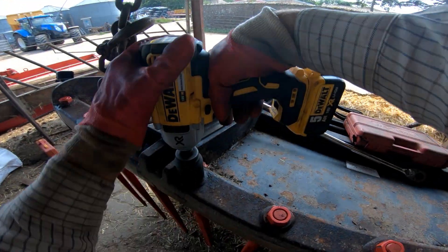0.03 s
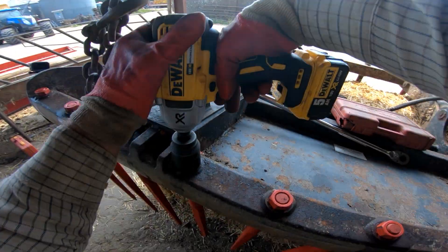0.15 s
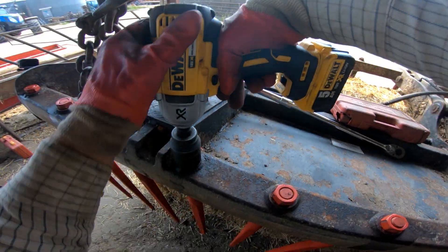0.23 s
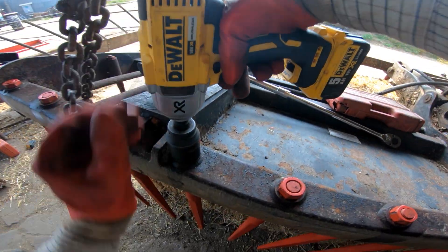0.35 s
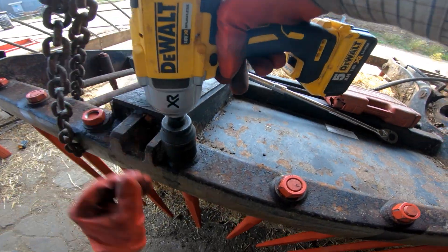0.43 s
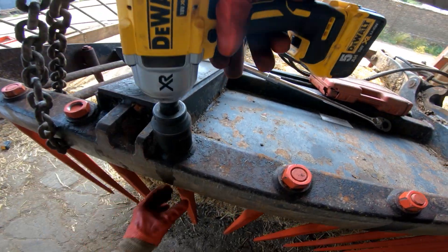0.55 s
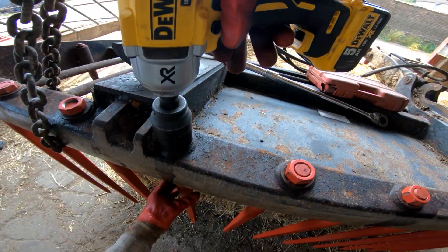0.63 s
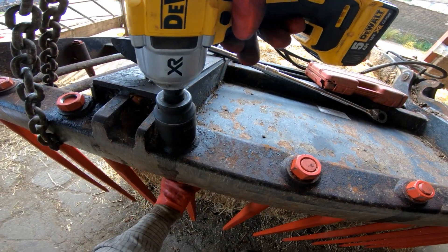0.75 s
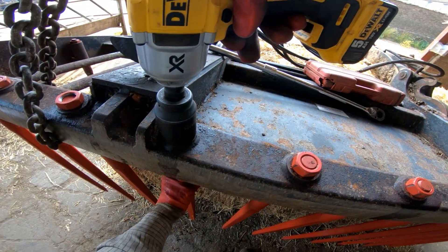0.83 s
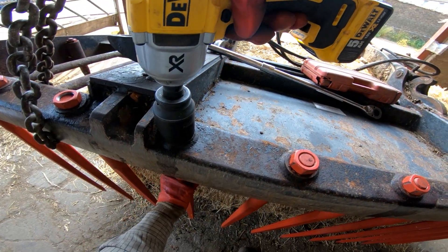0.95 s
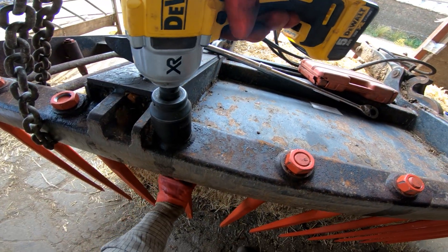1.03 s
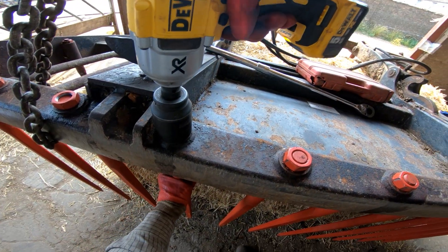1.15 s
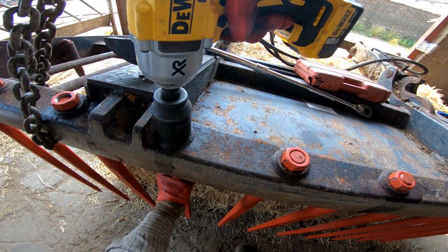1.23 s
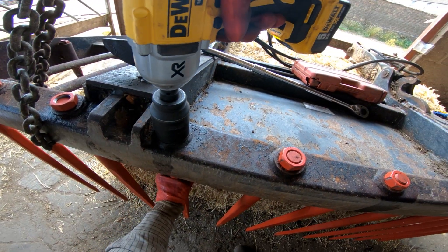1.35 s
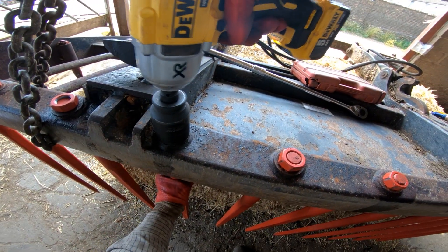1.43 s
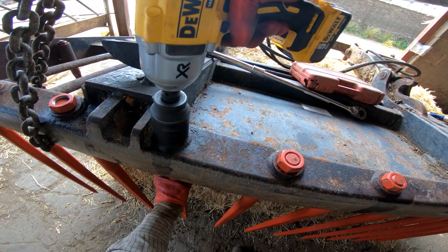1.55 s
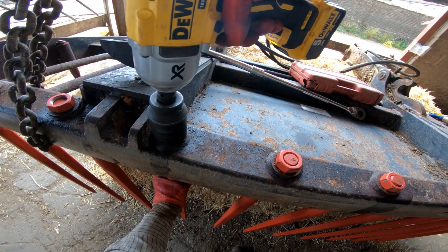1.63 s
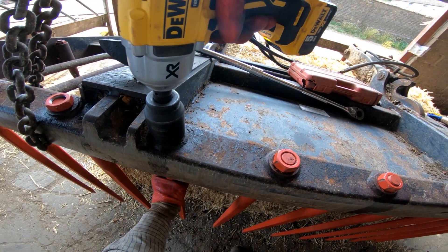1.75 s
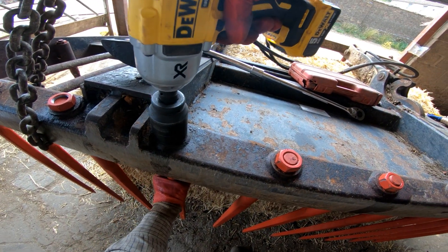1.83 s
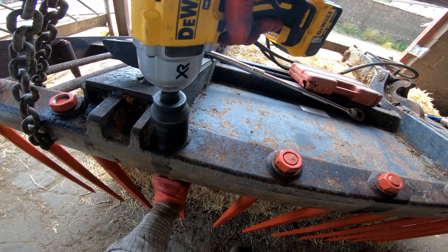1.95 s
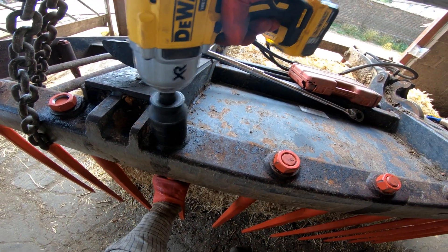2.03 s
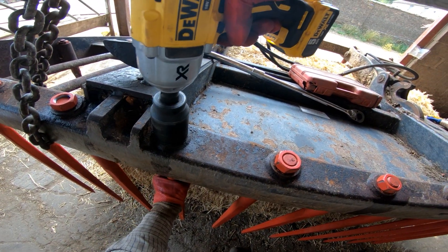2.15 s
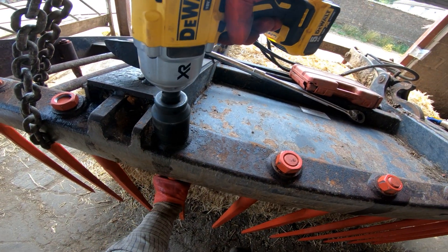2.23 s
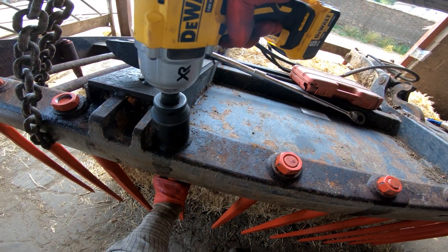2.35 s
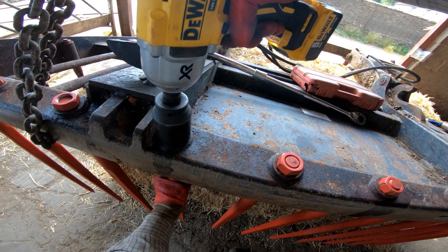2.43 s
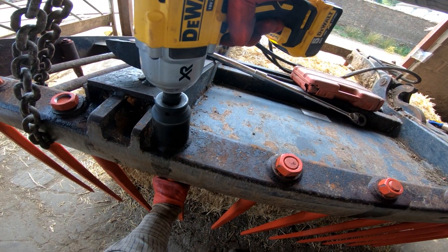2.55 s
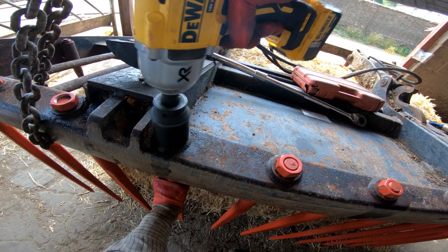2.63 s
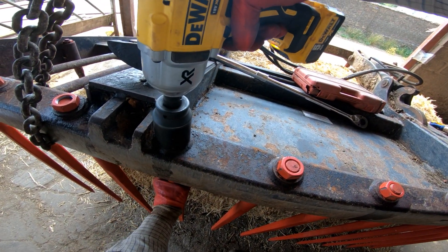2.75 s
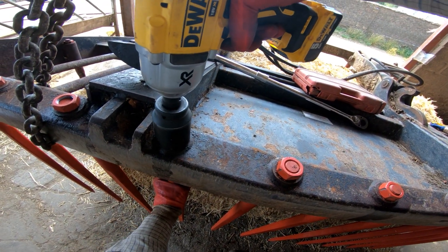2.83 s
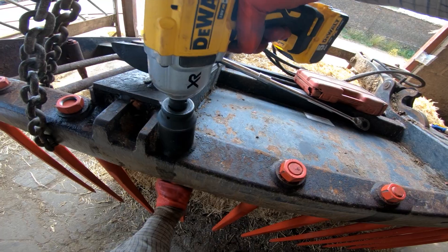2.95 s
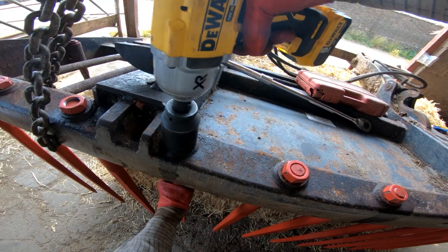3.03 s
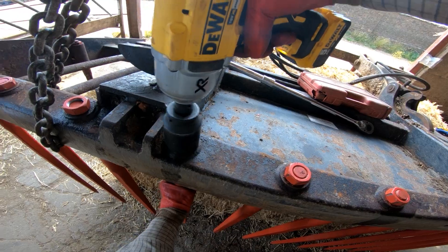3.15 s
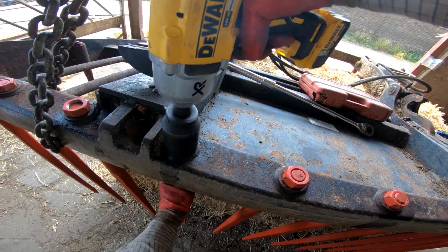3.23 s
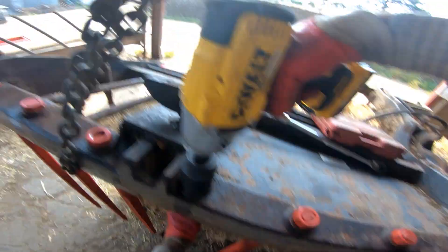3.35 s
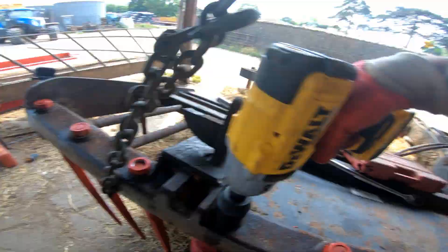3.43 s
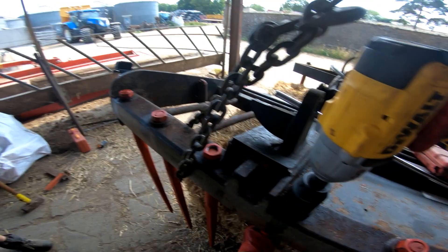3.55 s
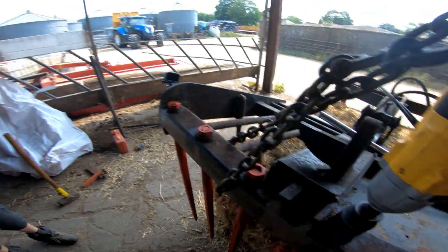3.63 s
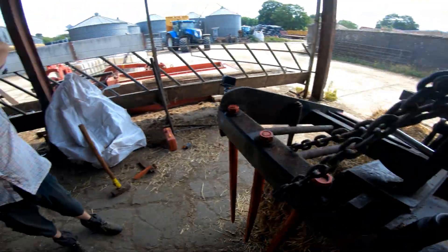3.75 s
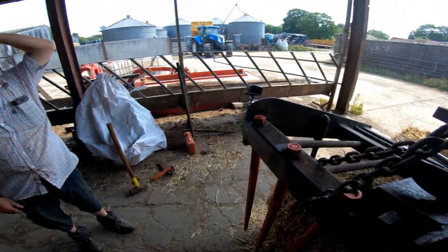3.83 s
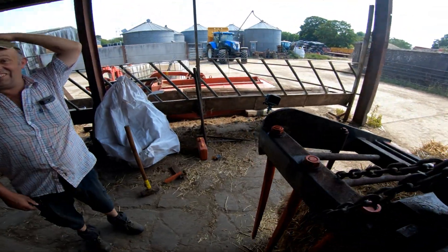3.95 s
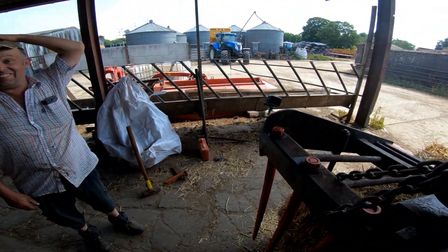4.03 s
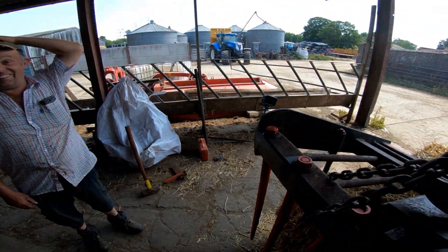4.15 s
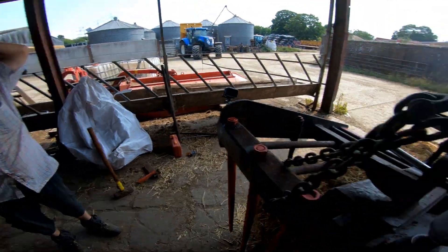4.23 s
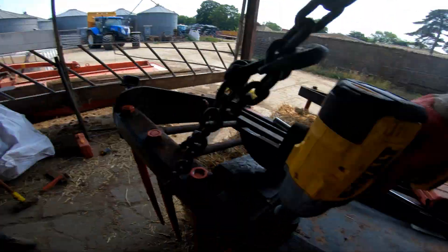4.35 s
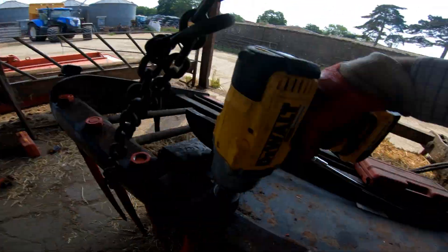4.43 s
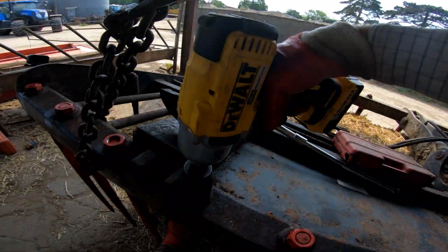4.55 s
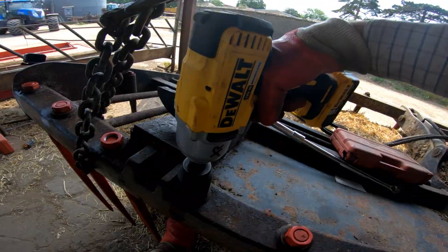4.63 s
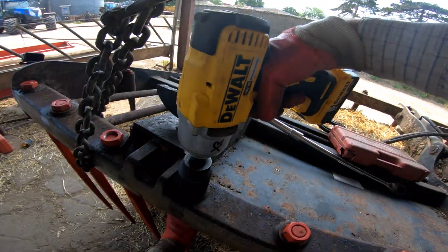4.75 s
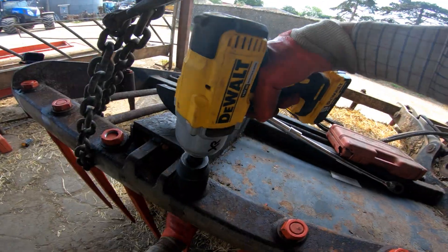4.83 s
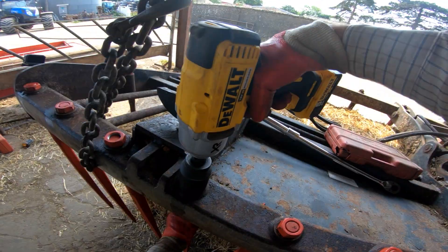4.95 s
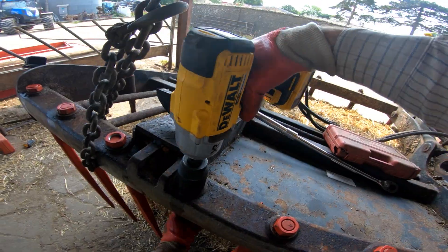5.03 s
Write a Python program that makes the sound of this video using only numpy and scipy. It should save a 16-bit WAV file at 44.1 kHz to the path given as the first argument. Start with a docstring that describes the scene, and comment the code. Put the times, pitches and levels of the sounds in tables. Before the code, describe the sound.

Diesel idle and hiss come first, with a soft low bump. Then a brief electric whirr and socket rattle lead into uneven first cracks and a loud, steady metallic hammering that buries the sinking engine. Gear whine and rattle sit beneath the blows. Past three seconds the colour shifts as the head turns, and the hammering runs on to the cut. Open shed, close action-camera microphone, almost mono with little echo.

```python
"""A cordless impact wrench tightens a nut on a heavy steel farm implement in an open shed.
First a diesel idles: firing pulses ring exhaust modes under shaped hiss, with wind rumble and low bumps.
At 1.2 s the wrench runs up: gear ticks, rotor hum, faster socket ticks. Uneven blows catch at 1.28 s, then
about 43 a second ring socket (noise bands) and frame (sine modes) while the engine sinks. From 3.4 s the
listener's head turns away, later partly back; two low tones slide down after 4.3 s. Almost mono."""
import sys
import numpy as np
from scipy import signal
from scipy.fft import rfft, irfft
from scipy.io import wavfile

SR = 44100
rng = np.random.default_rng(int(sys.argv[2]) if len(sys.argv) > 2 else 0)


def int16_out(signal):
    """Quantize to a 16-bit WAV file."""
    q = np.round(np.clip(np.atleast_2d(signal).T, -1, 1) * 32767)
    wavfile.write(sys.argv[1], SR, q.astype(np.int16))


N = 224380


def from_db(db):
    """Amplitude ratio of a level in dB."""
    return 10 ** (np.asarray(db) / 20)


def rms_one(x):
    """Scales a signal to rms 1."""
    return x / np.sqrt(np.mean(x ** 2) + 1e-20)


def in_time(rows):
    """Interpolates each column after the first over the time in the first."""
    s, *columns = np.transpose(rows)
    return [np.interp(np.arange(N) / SR, s, column) for column in columns]


def filtered(x, order, hz, kind):
    """Butterworth filter."""
    return signal.sosfilt(signal.butter(order, hz, kind, fs=SR, output="sos"), x)


def drift(rate_hz):
    """Slow random wander of rms 1: noise through a double pole, computed every 40 samples."""
    pole = np.exp(-80 * np.pi * rate_hz / SR)
    noise = rng.standard_normal(N // 40 + 2002)
    slow = signal.lfilter([1], [1, -2 * pole, pole * pole], noise)[2000:]
    return np.interp(np.arange(N) / 40, np.arange(len(slow)), rms_one(slow))


def clicks_at(seconds, sizes):
    """Single-sample clicks, summed where they coincide."""
    samples = np.clip((seconds * SR).astype(int), 0, N - 1)
    return np.bincount(samples.ravel(), np.ravel(sizes), N) + 1e-18


def ring(clicks, hz, t60_s):
    """Two-pole mode: a unit click starts a decaying sine of initial height 1."""
    pole, angle = from_db(-60 / (t60_s * SR)), 2 * np.pi * hz / SR
    return signal.lfilter([0, np.sin(angle)], [1, -2 * pole * np.cos(angle), pole * pole], clicks)


def soft(ringing, hz):
    """A contact of finite length: the ring starts without a click far from its pitch."""
    return filtered(ringing, 2, [.75 * hz, 1.33 * hz], "band")


def shaped(x, spectrum):
    """Weights a signal by a spectrum in dB, interpolated over log frequency."""
    hz, db = np.transpose(spectrum)
    grid_hz = np.arange(N // 2 + 1) * SR / N + 1
    gain = from_db(np.interp(np.log(grid_hz), np.log(hz), db))
    return irfft(rfft(x) * gain, N)


# Idling engine. Each row: time in seconds, drone level in dB rms, hiss level in dB rms.
ENGINE_LEVELS = [(0, -30, -29.5), (.3, -27.5, -30), (1.2, -30.5, -29), (1.5, -27.5, -32), (2.0, -74, -39.5),
                 (3, -43.5, -41.5), (5.09, -64, -46)]
# Exhaust modes. Each row: frequency in Hz, damping in Hz (t60 = 3.65 s / damping), relative level in dB.
EXHAUST_MODES = [(86, 10, -6), (114, 12, 0), (148, 14, -6), (205, 20, -3), (245, 25, -1), (350, 50, -8),
                 (490, 10, -10), (1190, 20, -21), (1442, 14, -19)]
# Fan and injector hiss spectrum. Each row: frequency in Hz, relative density in dB.
HISS_SPECTRUM = [(200, -4.5), (400, -8), (850, -16), (1440, -15.5), (3400, -21), (4700, -14), (5500, -18),
                 (6300, -15.5), (8140, -35), (11000, -46.5), (13000, -41.5), (15500, -58)]
FIRING_HZ = 27.53
WHINE_HZ, WHINE_PEAK_DB = 1447, -16   # against the rms of the hiss


def engine():
    """Uneven firing pulses with puffs of noise ring the exhaust; fan and injectors hiss above, a whine within."""
    drone_db, hiss_db = in_time(ENGINE_LEVELS)
    cycles = np.cumsum(FIRING_HZ * (1 + .02 * drift(2)) / SR)
    puff = np.exp(-3.0 * (cycles % 1))
    firing = np.diff(np.floor(cycles), prepend=0) * from_db(3 * drift(25))
    source = rms_one(firing) + 0.83 * rms_one(puff * rng.standard_normal(N))
    drone = sum(from_db(db) * rms_one(ring(source, hz, 3.65 / damping_hz))
                for hz, damping_hz, db in EXHAUST_MODES)
    drone = filtered(drone, 2, 48.0, "high")
    whine_cycles = np.cumsum(WHINE_HZ + 3.0 * drift(3.05)) / SR
    whine = from_db(WHINE_PEAK_DB + 2.0 * drift(4)) * np.sin(2 * np.pi * whine_cycles)
    puffing_noise = rng.standard_normal(N) * (1 + 0.23 * puff) * from_db(0.4 * drift(35))
    hiss = rms_one(shaped(puffing_noise, HISS_SPECTRUM))
    return from_db(drone_db) * rms_one(drone) + from_db(hiss_db) * (hiss + whine)


# Wind on the ports. Each row: time in seconds, level in dB.
WIND_LEVELS = [(0, -52), (.35, -40), (.5, -55), (1.1, -52), (1.4, -44), (2, -48), (3, -47.5), (3.7, -57.5),
               (5.09, -41)]


def wind():
    """Low band of noise with a lumpy level."""
    rumble = filtered(rng.standard_normal(N), 2, [30, 140], "band")
    return from_db(in_time(WIND_LEVELS)[0] + 3.8 * drift(35)) * rms_one(rumble)


# Low bumps felt through the microphone body. Each row: time in seconds, peak in dB, frequency in Hz.
BUMPS = [(0.086, -17.5, 253), (1.362, -9, 120), (1.733, -21, 65.6), (1.897, -30, 268), (2.057, -36, 107.3),
         (2.284, -29, 70), (3.114, -20, 79.9), (3.392, -25.5, 96), (3.577, -26, 113), (3.623, -27.5, 98.1),
         (3.717, -25.5, 103.3), (4.508, -24, 65), (4.813, -28, 65), (4.881, -26.5, 125.2)]


def handling():
    """Soft bumps: a cosine under a bell of 3 ms."""
    out, t = np.zeros(N), np.arange(-1500, 1500) / SR
    for s, db, hz in BUMPS:
        start = int(s * SR) - len(t) // 2
        out[start:][:len(t)] += from_db(db) * np.cos(2 * np.pi * hz * t) * np.exp(-(t / 0.003) ** 2)
    return out


# Wrench motor. Each row: time in seconds, gear rattle in dB rms, hum in Hz, hum level in dB rms.
MOTOR_LEVELS = [(1.215, -70, 246.2, -72), (1.232, -30, 243.4, -42), (1.275, -18, 250.2, -26.5),
                (1.33, -33, 249.5, -30), (1.47, -40, 261.5, -28.5), (1.62, -25.5, 263, -40),
                (1.93, -28.5, 266, -35.5), (2.03, -35, 261.6, -45.5), (3.16, -28.5, 262, -45.5),
                (4.06, -25.5, 256.2, -52), (4.56, -24, 253, -44), (5.09, -23, 257.5, -47.5)]
# Gear rattle spectrum. Each row: frequency in Hz, relative density in dB.
GEAR_SPECTRUM = [(1500, -27.5), (2400, -7.5), (3500, -2.5), (4700, 2), (6400, -9), (8500, -28),
                 (15600, -77)]


def motor():
    """Gear teeth tick densely, about 6000 a second, over the sine hum of the rotor."""
    rattle_db, hum_hz, hum_db = in_time(MOTOR_LEVELS)
    tick_here = rng.random(N) < 6000.0 / SR
    tick_db = 0.92 * np.minimum(rng.exponential(1, N), 3)
    ticks = tick_here * from_db(tick_db) * rng.choice([-1, 1], N)
    hum = np.sqrt(2) * from_db(hum_db + 2 * drift(5)) * np.sin(2 * np.pi * np.cumsum(hum_hz) / SR)
    return from_db(rattle_db) * rms_one(shaped(ticks, GEAR_SPECTRUM)) + hum


# Loose-socket ticks of the run-up. Each row: time in seconds, level in dB.
RUN_UP_TICKS = [(1.230, -15.5), (1.237, -18), (1.244, -12), (1.252, -18), (1.257, -14), (1.261, -13),
                (1.267, -10), (1.272, -12), (1.276, -17)]
# Loose-socket modes. Each row: frequency in Hz, level in dB added to the tick, t60 in seconds.
SOCKET_MODES = [(2470, -5, 0.012), (3580, -1, 0.016), (4870, -4, 0.012), (5300, -10, .015)]


def run_up():
    """The loose socket chatters until the hammer engages: each tick rings a few short modes."""
    s, db = np.transpose(RUN_UP_TICKS)
    out = 0
    for hz, mode_db, t60_s in SOCKET_MODES:
        clicks = clicks_at(s, from_db(db + mode_db + rng.normal(0, 2.2, len(s))))
        out = out + soft(ring(clicks, hz, t60_s), hz)
    return out


def nearest(s, rows):
    """Hands the value of each row to the blow closest to its time."""
    when, value = np.transpose(rows)
    return np.bincount(np.abs(s[:, None] - when).argmin(axis=0), value, len(s))


# Uneven first blows. Each row: time in seconds, body level in dB, added 1.5-3.5 kHz frame ring in dB,
# bare tick in dB.
FIRST_BLOWS = [(1.2798, -13, 1, -12), (1.3166, -32, 15, -3), (1.3275, -12.5, 3.5, -7), (1.348, -33, -6, 1),
               (1.356, -12.5, -8, -6), (1.3821, -11, 2.5, -3)]
# Pace, slowing slightly as the nut tightens. Each entry: time of every eighth blow in seconds.
EIGHTH_BLOW_S = [1.4066, 1.5908, 1.7735, 1.9566, 2.1409, 2.3254, 2.5109, 2.6942, 2.8797, 3.0648, 3.2484,
                 3.4329, 3.6187, 3.8046, 3.9902, 4.1767, 4.3633, 4.5508, 4.7374, 4.9240, 5.1102]
# Steady run. Each row: time in seconds, body level in dB, added 1.5-3.5 kHz frame ring in dB,
# lug imbalance in dB (added and subtracted on alternate blows).
STEADY_BLOWS = [(1.4, -12, 3, 0.5), (1.7, -15.5, 5.5, 3), (1.9, -13.5, 3, 0.5), (2.15, -14.5, 0.5, 1),
                (2.42, -14, 1.5, -0.5), (2.65, -13, 3, 0), (3.05, -13.5, 6, -0.5), (3.45, -14, 2.5, -1),
                (3.8, -16.5, 4, 0.5), (4.05, -15, -1.5, -1.5), (4.3, -15, -3, 0), (4.5, -15, 0, -1.5),
                (4.75, -15, -3.5, -1), (5.09, -14.5, 3.5, -1.5)]
# Blows that glance off. Each row: time in seconds, body loss in dB.
GLANCING_BLOWS = [(1.980, 5), (2.290, 3), (2.856, 3.5), (3.920, 3), (3.990, 1), (4.083, 8.5), (4.270, 3.5),
                  (4.457, 1.5), (4.503, 6)]
# Blows with altered 1.5-3.5 kHz frame ring, mostly dull. Each row: time in seconds, ring loss in dB.
DEAD_BLOWS = [(1.568, 7), (1.728, 14), (1.751, 14), (2.095, 14), (2.395, 30), (3.619, 6), (3.967, 10),
              (4.154, -1)]
PACE_JITTER_S, LAST_BLOW_S = .0003, 5.07
BLOW_SPREAD_DB, RING_SPREAD_DB = 0.58, 1.5
TICK_DB, GLANCE_TICK_SHARE = -13, 1.1   # share: dB gained by the tick per dB of body lost


def hammer():
    """Lists blows as (s, body dB, frame ring dB, tick dB): the first catch, then two lugs strike in turn."""
    groups = len(EIGHTH_BLOW_S)
    number = np.arange(8 * groups - 8)
    chance = rng.standard_normal((len(number), 3))
    s = np.interp(number / 8, np.arange(groups), EIGHTH_BLOW_S) + PACE_JITTER_S * chance[:, 0]
    at, *columns = np.transpose(STEADY_BLOWS)
    level_db, ring_db, lead_db = [np.interp(s, at, column) for column in columns]
    loss_db = nearest(s, GLANCING_BLOWS)
    level_db = level_db + lead_db * (-1) ** number + BLOW_SPREAD_DB * chance[:, 1] - loss_db
    ring_db = ring_db + RING_SPREAD_DB * chance[:, 2] - nearest(s, DEAD_BLOWS)
    steady = np.c_[s, level_db, ring_db, TICK_DB + GLANCE_TICK_SHARE * loss_db]
    return np.r_[FIRST_BLOWS, steady[s < LAST_BLOW_S]]


# Contacts in one blow as the socket rebounds on the nut. Each row: delay in seconds, drive outside
# 1.5-3.5 kHz in dB, drive within it in dB, bare tick in dB, timing spread in seconds.
REBOUNDS = [(0, 1.5, -2.5, -1, 0), (.0034, -3, -2, -11, 0.0017), (.0062, -10.5, -1, -12.5, 0.0016),
            (0.0118, -8.5, -2.5, -8.5, 0.002), (.016, -18.5, -10, -19.5, 0.0018)]


def contacts(blows):
    """Times of every contact, blows x rebounds, and its drive outside and within 1.5-3.5 kHz."""
    delay_s, outer_db, middle_db, _, spread_s = np.transpose(REBOUNDS)
    chance = rng.standard_normal((len(blows), 2, len(REBOUNDS)))
    uneven_db = 0.73 * chance[:, 1] * (delay_s > 0)
    times = blows[:, :1] + delay_s + spread_s * chance[:, 0]
    return times, from_db(outer_db + uneven_db), from_db(middle_db + uneven_db)


CRACK_DB, CRACK_S = 5, .0012   # first blow, landing from full speed; decay constant of every burst
TICK_SPREAD_DB, TICK_TOP_HZ = 0.5, 6960


def crack(blows, times):
    """Millisecond noise burst per contact; the first blow adds a far louder one without the extra top cut."""
    level_db = blows[:, 3:] + np.array(REBOUNDS)[:, 3] + TICK_SPREAD_DB * rng.standard_normal(times.shape)
    clicks = [clicks_at(times[0, :1], from_db([CRACK_DB])), clicks_at(times, from_db(level_db))]
    envelopes = signal.lfilter([1], [1, -np.exp(-1 / (CRACK_S * SR))], clicks)
    bursts = envelopes * rng.choice([-1, 1], N)
    first, ticks = filtered(bursts, 2, [2500, 6500], "band")
    return first + filtered(ticks, 4, TICK_TOP_HZ, "low")


# Dense ring of socket and nut. Each row: frequency in Hz, relative level facing in dB,
# relative level turned away in dB, t60 in seconds.
CLANG_BANDS = [(410, -21.5, -14.5, 0.023), (662, -43, -39, 0.017), (900, -13.5, -13.5, 0.024),
               (1364, -30, -44, 0.021), (1600, -20, -14, 0.034), (2370, -5.5, -12, 0.058),
               (3390, -9, -14, 0.048), (4410, -7, -11, 0.095), (5250, 1.5, 0.5, 0.036),
               (5360, -3.5, -4, 0.048), (6790, -1.5, 2, 0.015), (7120, -9, -27, 0.02),
               (8320, -98.5, -102, 0.021), (10600, -104, -42, 0.09), (13900, -107, -116, .03)]


def clang(blows, times, outer, middle, away):
    """Too many modes to tell apart: bands of noise that jump at each contact and die away."""
    out, white = 0, rng.standard_normal((2, N))
    colour = rng.standard_normal((len(blows), len(CLANG_BANDS)))
    hz = np.array(CLANG_BANDS)[:, 0]
    edges_hz = np.sqrt(np.r_[.4 * hz[0], hz] * np.r_[hz, 1.35 * hz[-1]])
    for k, (centre_hz, facing_db, away_db, t60_s) in enumerate(CLANG_BANDS):
        drive = middle if 1500 < centre_hz < 3500 else outer
        spread_db = 1.5 + 4.0 * (k > 11)   # the top bands vary most
        strength = from_db(blows[:, 1:2] + spread_db * colour[:, k:k + 1]) * drive
        # contacts add in power
        power = signal.lfilter([1], [1, -from_db(-120 / (t60_s * SR))], clicks_at(times, strength ** 2))
        band = filtered(white[k % 2] * np.sqrt(power), 2, edges_hz[k:k + 2], "band")
        out = out + from_db(facing_db + away * (away_db - facing_db)) * band
    return from_db(8.5) * out


# Single modes of frame and tines. Each row: frequency in Hz, relative level facing in dB,
# relative level turned away in dB, t60 in seconds.
FRAME_MODES = [(86.4, -36, -52.5, 0.11), (117.8, -36.5, -48, 0.36), (549, -41.5, -36.5, 0.21),
               (808, -42, -33, 0.082), (1742, -30, -33.5, 0.1), (2323, -27, -35, 0.28),
               (2445, -24, -29, 0.082), (2786, -16.5, -12, 0.035), (2943, -23.5, -13.5, 0.044),
               (3078, -23, -15, 0.1), (3490, -27, -8.5, 0.029), (3897, -23.5, -18.5, 0.16),
               (4220, -22.5, -12.5, 0.058), (4390, -12.5, -9, 0.033), (4663, -10, -5.5, 0.044),
               (4840, -12, -4.5, 0.016), (5355, -12, -13, 0.052), (6336, -11.5, -16, 0.033)]


def frame(blows, times, outer, middle, away, bass_db):
    """Every contact strikes every mode; low modes are pushed alike each time, high ones this way or that."""
    out = 0
    chance = rng.random((len(FRAME_MODES), 2) + times.shape)
    for (hz, facing_db, away_db, t60_s), (turn, size) in zip(FRAME_MODES, chance):
        is_middle = 1500 < hz < 3500
        level_db = blows[:, 1:2] + blows[:, 2:3] * is_middle + 3.2 * (size - .5)
        sign = np.where(turn < np.clip(hz / 4000.0 - .2, 0, .5), -1, 1)
        clicks = clicks_at(times, from_db(level_db) * sign * (middle if is_middle else outer))
        heard_db = facing_db + away * (away_db - facing_db) + (hz < 400) * bass_db
        out = out + from_db(heard_db) * soft(ring(clicks, hz, t60_s), hz)
    return from_db(3.5) * out


# Short falling low tones. Each row: time in seconds, peak in dB.
FALLING_TONES = [(4.384, -33), (4.58, -32)]
FALL_FROM_HZ, FALL_HZ_PER_S, FALL_BELL_S = 230, 1840, 0.026   # pitch is that at the peak


def falling_tones():
    """Brief low sines that slide down in pitch under a bell envelope."""
    s, peak_db = np.transpose(FALLING_TONES)
    t = np.arange(N) / SR - s[:, None]
    cycles = FALL_FROM_HZ * t - FALL_HZ_PER_S * t ** 2 / 2
    return from_db(peak_db) @ (np.sin(2 * np.pi * cycles) * np.exp(-(t / FALL_BELL_S) ** 2))


# Listener. Each row: time in seconds, head turned away 0-1, gain of frame modes below 400 Hz in dB.
HEAD = [(1.3, 0.1, 31), (1.6, 0.16, 6.5), (2.1, 0.18, 6.5), (3.35, 0.02, -1), (3.7, 0.95, 16),
        (4.7, 0.95, 9), (5.09, 0.67, 11)]
# Stereo width by frequency. Each row: frequency in Hz, side gain in dB.
STEREO_WIDTH = [(60, -36), (2400, -53.5), (8000, -22.5), (10500, -10), (12000, 2), (16000, -2.5)]
HISS_DB = -68   # independent white noise per channel, level before its 12 kHz high-pass


def scene():
    """Nearly mono below, wide in the top treble, from a delayed side signal and independent hiss."""
    away, bass_db = in_time(HEAD)
    blows = hammer()
    hits = contacts(blows)
    mid = engine() + wind() + handling() + motor() + run_up()
    mid = mid + crack(blows, hits[0]) + clang(blows, *hits, away) + frame(blows, *hits, away, bass_db)
    mid = mid + falling_tones()
    delayed = np.roll(mid, 29)   # samples
    side = shaped((0.16 * mid + delayed) * signal.windows.tukey(N, .01), STEREO_WIDTH)
    hiss = filtered(rng.standard_normal((2, N)), 6, 12000, "high")
    return mid + side * [[1], [-1]] + from_db(HISS_DB) * hiss


CUTOFF_HZ = 15720


def record(dry):
    """Subsonics are blocked, the port has a dip near 11 kHz, only full-scale peaks are rounded, the top is cut."""
    blocked = signal.lfilter([1, -1], [1, -.997], dry)
    ported = signal.lfilter(*signal.iirnotch(11200.0, 4.0, fs=SR), blocked)
    rounded = ported / (1 + ported ** 8) ** (1 / 8)
    return .95 * signal.sosfilt(signal.ellip(16, .5, 70, CUTOFF_HZ, fs=SR, output="sos"), rounded)


dry = scene()
out = record(dry)
int16_out(out)
```